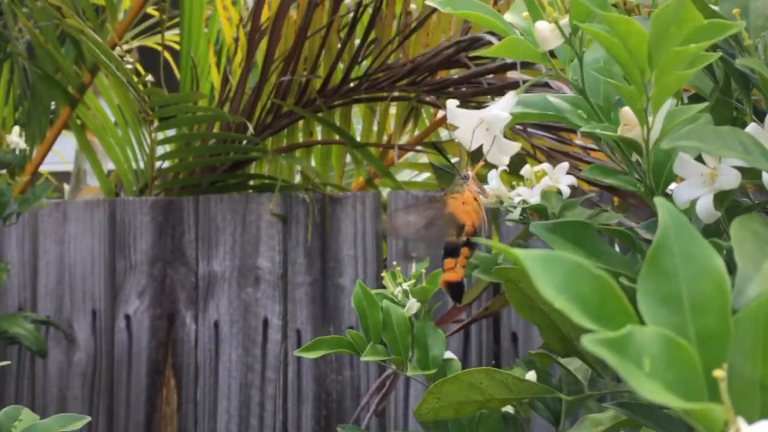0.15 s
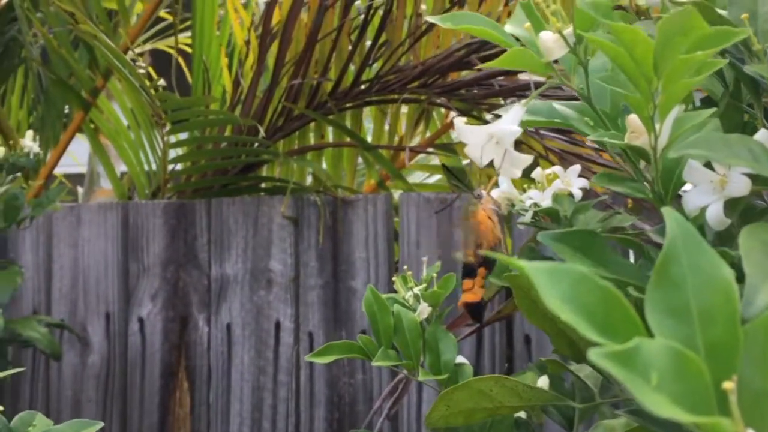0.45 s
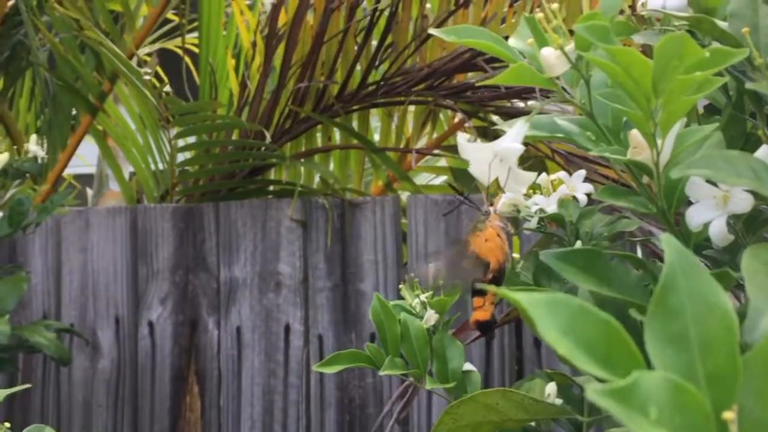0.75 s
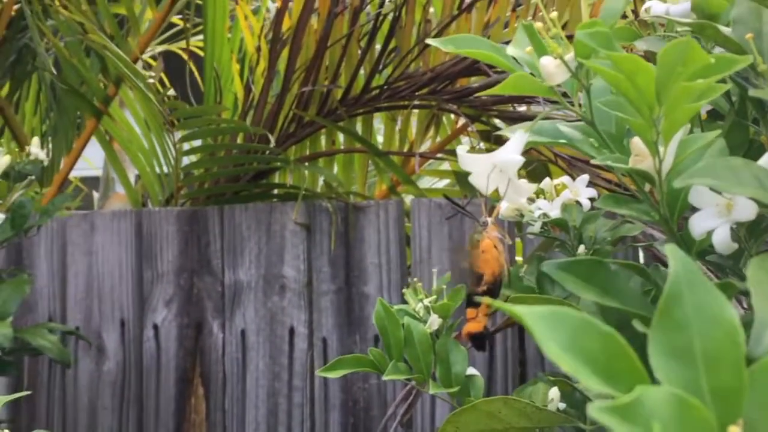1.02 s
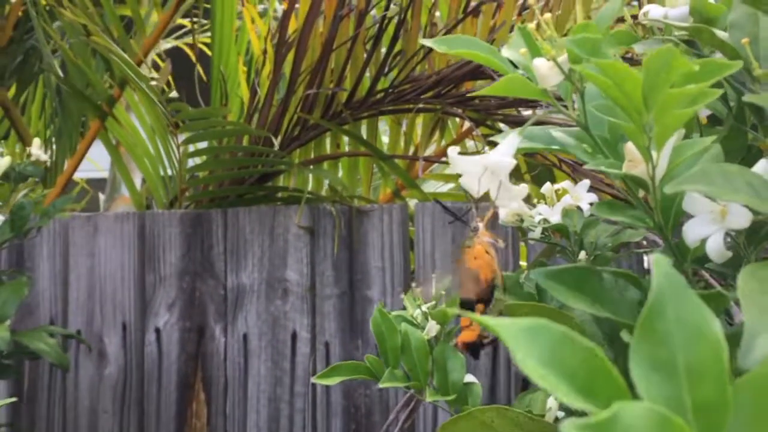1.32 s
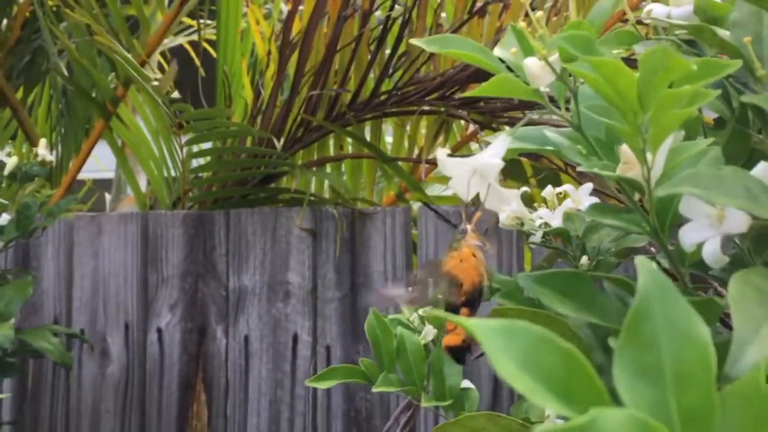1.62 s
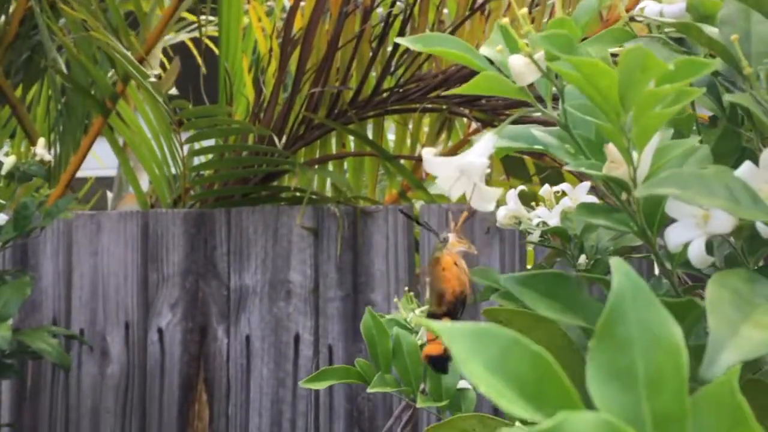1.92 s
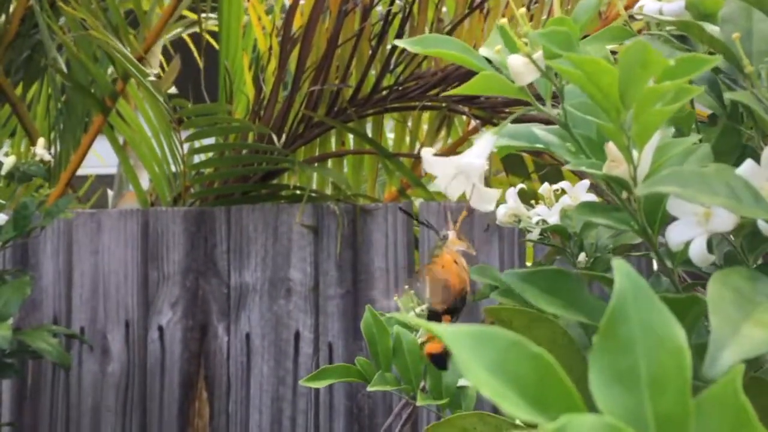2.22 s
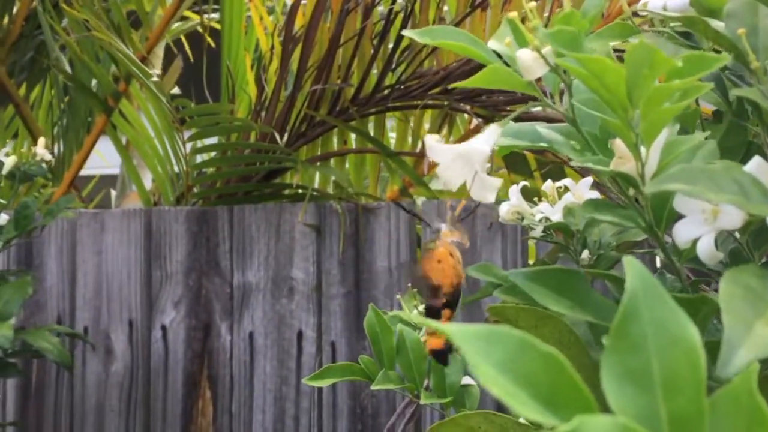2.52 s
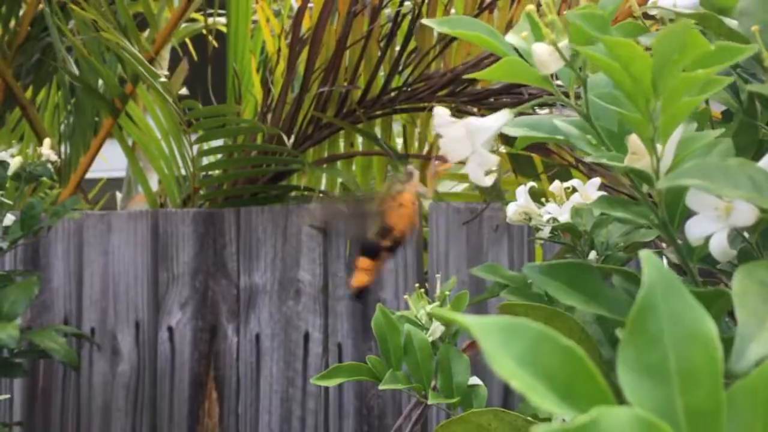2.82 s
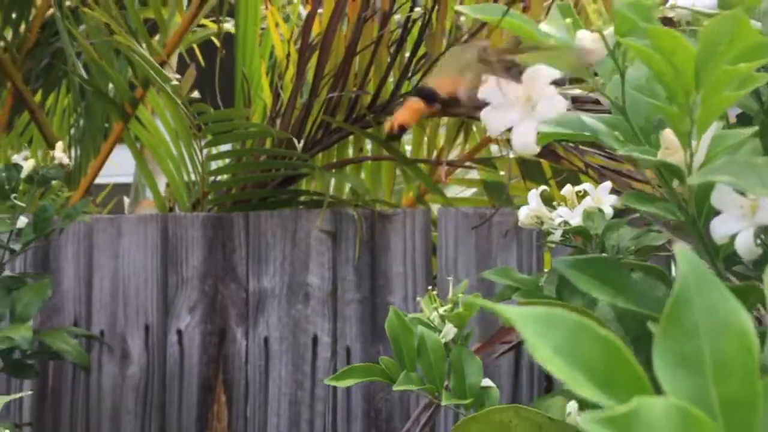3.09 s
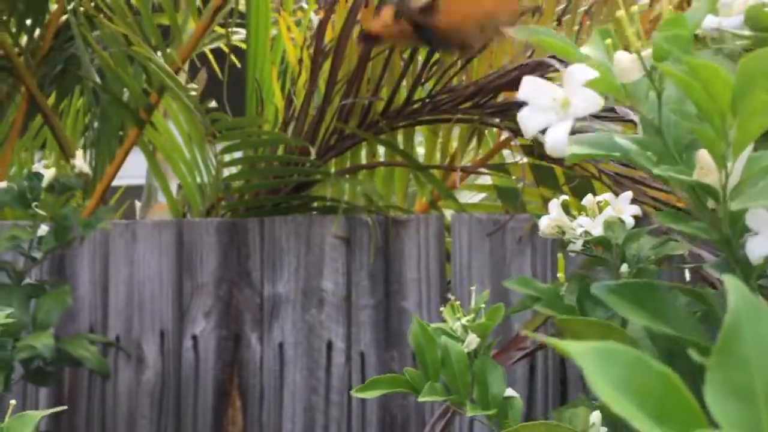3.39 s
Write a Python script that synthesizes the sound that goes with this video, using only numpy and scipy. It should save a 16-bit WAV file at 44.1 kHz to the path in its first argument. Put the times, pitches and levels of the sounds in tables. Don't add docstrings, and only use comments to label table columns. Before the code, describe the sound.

Fast pulsing moth wings emerge late from low engine rumble and distant traffic, with crisp leaf-brush snaps crowding together as the insect sweeps right by a phone outdoors; faint insect notes come early.

```python
import sys
import numpy as np
from scipy import signal
from scipy.fft import rfft, irfft
from scipy.io import wavfile

SR = 44100
rng = np.random.default_rng(int(sys.argv[2]) if len(sys.argv) > 2 else 0)


def file_out(sig):
    cols = np.atleast_2d(sig).T
    lim = np.clip(cols, -1, 1)
    pcm = np.round(lim * 32767).astype(np.int16)
    wavfile.write(sys.argv[1], SR, pcm)


def convert_level_to_amplitude(level_db):
    exponent = np.asarray(level_db, float) / 20
    return 10 ** exponent


N = 156555
TOP_HZ = 15740
SHAFT_HZ, MAINS_BUZZ_HZ = 51.105, 100.08


def in_time(rows):
    s, *columns = np.transpose(rows)
    return [np.interp(np.arange(N) / SR, s, column) for column in columns]


def rms_one(x):
    return x / np.sqrt(np.mean(x ** 2) + 1e-20)


def drift(rate):
    pole = np.exp(-80 * np.pi * rate / SR)
    noise = rng.standard_normal(N // 40 + 4002)
    slow = signal.lfilter([1], [1, -2 * pole, pole ** 2], noise)[4000:]
    return np.interp(np.arange(N) / 40, np.arange(len(slow)), rms_one(slow - slow.mean()))


def colour(x, spectrum):
    hz = np.fft.rfftfreq(N, 1 / SR) + 1
    at_hz, db = np.transpose(spectrum)
    gain = convert_level_to_amplitude(np.interp(np.log(hz), np.log(at_hz), db, left=-200))
    return irfft(rfft(x) * gain * (hz < TOP_HZ), N)


def patchy_noise(spectrum, patchy_db, rate):
    whole = rfft(colour(rng.standard_normal(N), spectrum))
    hz = np.fft.rfftfreq(N, 1 / SR)
    edges = np.geomspace(spectrum[0][0], spectrum[-1][0], 7)
    out = 0
    for low, high in zip(edges, edges[1:]):
        band = irfft(whole * ((hz >= low) & (hz < high)), N)
        out = out + convert_level_to_amplitude(patchy_db * drift(rate)) * band
    return rms_one(out)


def tone(hz, width_hz, wander_db):
    turns = np.cumsum(hz + width_hz * drift(2.93)) / SR + rng.random()
    return np.sqrt(2) * np.sin(2 * np.pi * turns) * convert_level_to_amplitude(wander_db * drift(2.8))


# time_s, beats
WING_BEATS = [(0, 0), (2.3955, 135), (2.677, 151), (2.9552, 167), (3.005, 170), (3.1024, 176), (3.204, 182),
              (3.269, 186), (3.3055, 188), (3.371, 192), (3.406, 194), (3.480, 198), (3.5588, 203)]
# time_s, rustle_db, throb_db
CLOSENESS = [(0, -98, -76), (1.6, -97, -76), (1.85, -88, -76), (2.2, -93, -76), (2.6, -83, -74),
             (2.75, -84, -72), (2.85, -81, -70), (2.95, -81, -66), (3.06, -74.5, -62), (3.15, -76.5, -61),
             (3.22, -75.5, -62), (3.3, -78, -58), (3.33, -77, -53), (3.365, -75.5, -50), (3.41, -77, -56),
             (3.465, -75.5, -60), (3.495, -72, -54), (3.52, -69, -50), (3.55, -65, -54)]
# frequency_hz, level_db per Hz
RUSTLE_COLOUR = [(2000, -3), (4000, 1.5), (4900, -4), (6200, 0), (7800, -2.5), (9400, -.5), (10400, -3),
                 (15700, 1)]
# multiple of the beat rate, level_db
THROB_HARMONICS = [(1, 0), (2, -2), (3, -9), (4, -14), (5, -16)]


def wings():
    tick_lead_beats, throb_lag_beats = .05, .16
    tick_s, tick_spread_db, upstroke_db = .0004, 2, -4
    second_wing_s, second_wing_db = .0028, -5
    swish_share = .33
    (beats,) = in_time(WING_BEATS)
    rustle_db, throb_db = in_time(CLOSENESS)

    half = np.floor(2 * (beats + tick_lead_beats)).astype(int)
    strokes = np.arange(half[-1] + 1)
    strength = convert_level_to_amplitude(tick_spread_db * rng.standard_normal(len(strokes)) + upstroke_db * (strokes % 2))
    reversals = np.diff(half, prepend=0) * strength[half]
    second_wing = np.roll(reversals, int(second_wing_s * SR))
    reversals = reversals + convert_level_to_amplitude(second_wing_db + 3 * drift(40)) * second_wing

    fade = np.exp(-1 / (tick_s * SR))
    ticks = rms_one(signal.lfilter([1], [1, -2 * fade, fade ** 2], reversals))
    swish = convert_level_to_amplitude(1.5 * drift(30))
    gate = np.sqrt((1 - swish_share) * ticks ** 2 + swish_share * swish ** 2)
    rustle = rms_one(colour(gate * rng.standard_normal(N), RUSTLE_COLOUR))

    stroke_phase = 2 * np.pi * (beats - throb_lag_beats)
    throb = sum(convert_level_to_amplitude(db) * np.cos(k * stroke_phase) for k, db in THROB_HARMONICS)
    return convert_level_to_amplitude(rustle_db) * rustle - convert_level_to_amplitude(throb_db) * np.sqrt(2) * throb


# middle_s, peak_db, lowest_hz, highest_hz
PETAL_BRUSHES = [(1.785, -63, 11000, 15500), (1.803, -65, 5000, 10000), (2.26, -64, 11000, 15500),
                 (2.3955, -58, 11500, 15500), (2.512, -61, 11000, 15500), (2.566, -60, 12000, 15500),
                 (2.585, -65, 11000, 15500), (2.617, -64, 6000, 15500), (2.663, -63, 13000, 15500),
                 (2.677, -56.5, 12000, 15500), (2.707, -64, 12500, 15500), (2.796, -65, 8500, 13000),
                 (2.813, -65, 9000, 14000), (2.881, -66, 9000, 15000), (2.898, -64, 7500, 11000),
                 (2.941, -63, 11000, 15500), (2.9552, -57, 10500, 15500), (2.998, -63, 3200, 4800),
                 (3.0215, -60, 11500, 15500), (3.047, -56, 3000, 6000), (3.063, -56, 3000, 7000),
                 (3.1024, -59, 9000, 15500), (3.138, -62, 8500, 13000), (3.172, -61, 9000, 15500),
                 (3.189, -59, 8000, 15500), (3.204, -50, 3800, 16200), (3.236, -62, 10000, 15500),
                 (3.262, -55, 3000, 5200), (3.339, -62, 7500, 14500), (3.371, -60, 6000, 15500),
                 (3.406, -61, 8500, 15500), (3.4245, -62, 8000, 15500), (3.443, -62, 5000, 14500),
                 (3.462, -62, 9000, 15500), (3.4805, -60, 7000, 15500), (3.4875, -59, 5000, 14000),
                 (3.4965, -55, 5500, 15500), (3.5055, -58, 2500, 15500), (3.5115, -58, 6000, 15500),
                 (3.5142, -58, 4000, 13500), (3.5175, -58, 3500, 7000), (3.5207, -56, 9000, 15500),
                 (3.5297, -56, 5500, 12500), (3.533, -59, 4000, 7000), (3.5425, -52, 8000, 15500),
                 (3.545, -52, 6000, 15500)]


def brushes():
    size, lead_s = 1024, .005
    out = np.zeros(N + 2000)
    hz = np.fft.rfftfreq(size, 1 / SR)
    after = np.maximum(np.arange(size) / SR - lead_s, 0)
    for s, db, low_hz, high_hz in PETAL_BRUSHES:
        length_s = .0008 * np.sqrt(8000 / low_hz)
        puff = rng.standard_normal(size) * after * np.exp(-2 * after / length_s)
        low_cut = 1 / (1 + (low_hz / (hz + 1)) ** 6)
        high_cut = (hz < max(TOP_HZ, high_hz)) / (1 + (hz / high_hz) ** 12)
        puff = irfft(rfft(puff) * low_cut * high_cut)
        i = int((s - length_s / 2 - lead_s) * SR)
        out[i:i + size] += convert_level_to_amplitude(db) * puff / np.abs(puff).max()
    return out[:N]


# time_s, deep_db, light_db, far_db
ENGINE_LOAD = [(0, 1, -5, -8), (.22, -3, -3, -2), (.5, 1, 2, 2), (.7, -7, -2, -2), (.95, -1, -2, 2),
               (1.2, -3, -2, 0), (1.42, -2, -2, 3), (1.62, 7, 0, -4), (1.85, -2, 4, -4), (2.05, 7, 3, 1),
               (2.35, 5, 1, -2), (2.6, -3, -1.5, -1), (2.85, -3, 0, 3), (3.1, -4, -4, 0),
               (3.22, -5, -4, -6), (3.4, -5, 0, -9), (3.55, -3, -2, -9)]
# pitch_hz, level_db rms
DEEP_ENGINE = [(48, -56), (291, -79)]
LIGHT_ENGINE = [(90.2, -57), (134.9, -65), (179.7, -76.5)]
# pitch_hz, level_db rms, width_hz
FAR_DRONES = [(59.2, -60, 2.5), (65, -61, 2.5), (73, -62, 2.5), (122, -63, 2.5)]


def engines():
    deep_db, light_db, far_db = in_time(ENGINE_LOAD)
    deep = sum(convert_level_to_amplitude(deep_db + db) * tone(hz, .6, 1.0) for hz, db in DEEP_ENGINE)
    light = sum(convert_level_to_amplitude(light_db + db) * tone(hz, .6, 1.0) for hz, db in LIGHT_ENGINE)
    far = sum(convert_level_to_amplitude(far_db + db) * tone(hz, width_hz, 1.5) for hz, db, width_hz in FAR_DRONES)
    return deep + light + far


# multiple of the shaft, level_db rms
SHAFT_ORDERS = [(3, -65.5), (5, -72), (6, -80), (8, -75), (9, -77), (10, -79), (12, -78), (16, -70.5),
                (69, -96), (74, -95), (75, -96), (76, -96), (82, -89)]
# frequency_hz, level_db rms
VALVE_RATTLE = [(1000, -88), (1700, -93), (2300, -94), (3100, -97), (3800, -97), (4400, -104), (5200, -102)]


def compressor():
    fourth_db, fan_db, together_s = -70.5, -68.5, .2
    rattle_spread_db = 2
    hum = sum(convert_level_to_amplitude(db) * tone(k * SHAFT_HZ, .3, 1.0) for k, db in SHAFT_ORDERS)

    turn = 2 * np.pi * (np.arange(N) / SR - together_s)
    fourth = convert_level_to_amplitude(fourth_db) * np.cos(4 * SHAFT_HZ * turn)
    fan = convert_level_to_amplitude(fan_db) * np.cos(2 * MAINS_BUZZ_HZ * turn)
    pair = np.sqrt(2) * (fourth + fan)

    shaft = turn * SHAFT_HZ + .05 * drift(1.5)
    rattle_hz, rattle_db = np.transpose(VALVE_RATTLE)
    rattle = 0
    for k in range(20, 103):
        db = np.interp(k * SHAFT_HZ, rattle_hz, rattle_db) + 1.0
        db = db + rattle_spread_db * rng.standard_normal()
        rattle = rattle + convert_level_to_amplitude(db) * np.sin(k * shaft + 2 * np.pi * rng.random())
    return hum + pair + rattle


# multiple of the mains buzz, level_db rms
MOTOR_WHINE = [(50, -101), (56, -103), (57, -91), (58, -95), (59, -99.5), (60, -101), (61, -103), (63, -99)]
# time_s, lower_db rms, upper_db rms
WHISTLE_LEVELS = [(0, -99, -100), (.35, -87, -96), (.85, -87, -91), (1.2, -88, -100), (1.45, -96, -90),
                  (2.5, -95, -90), (2.85, -90, -92), (3.2, -94, -89), (3.55, -96, -94)]
WHISTLE_PITCHES = (9786, 9990.5)


def motor():
    whine = sum(convert_level_to_amplitude(db) * tone(k * MAINS_BUZZ_HZ, 1.5, 1.5) for k, db in MOTOR_WHINE)
    levels = in_time(WHISTLE_LEVELS)
    whistles = sum(convert_level_to_amplitude(db) * tone(hz, 2.5, 2.0) for hz, db in zip(WHISTLE_PITCHES, levels))
    return whine + whistles


# start_s, length_s, level_db rms, pitch_hz
INSECT_NOTES = [(.03, .06, -90, 12205), (.135, .09, -81, 12013), (.312, .12, -80.5, 14444),
                (.35, .2, -90, 9159), (.415, .05, -89, 13600), (.6, .1, -84, 12210), (.615, .09, -81, 6520),
                (.695, .07, -84, 12100), (.69, .08, -91, 9159), (1.77, .05, -88, 12950),
                (2.06, .13, -86, 7510)]


def insects():
    attack_s, fade_db, width_hz = .012, -14, 31
    t, out = np.arange(N) / SR, 0
    for s, length_s, db, hz in INSECT_NOTES:
        attack = np.clip((t - s) / attack_s, 0, 1)
        fade = fade_db * np.maximum((t - s) / length_s, 0) ** 1.5
        out = out + convert_level_to_amplitude(db + fade) * attack * tone(hz, width_hz, 1.0)
    return out


# middle_s, length_s, level_db rms, centre_hz
PASSING_CARS = [
    (1.29, .3, -66, 1240),
    (1.77, 0.55, -67.5, 1000),
    (0.8, 0.24, -69.5, 1130),
    (2.5, 0.3, -85, 770),
]


def cars():
    half_width_oct = 0.27
    t, out = np.arange(N) / SR, 0
    for s, length_s, db, hz in PASSING_CARS:
        edges_hz = hz * 2 ** (half_width_oct * np.array([-1, 1]))
        band = signal.butter(2, edges_hz, "band", fs=SR, output="sos")
        tyres = rms_one(signal.sosfilt(band, rng.standard_normal(N)))
        out = out + convert_level_to_amplitude(db) * np.exp(-(2 * (t - s) / length_s) ** 2) * tyres
    return out


# time_s, level_db
TRAFFIC_SWELL = [(0.0, -64), (0.03, -62.5), (1.27, -62), (1.86, -62), (1.89, -61), (1.97, -61.5),
                 (2.3, -63), (3.39, -61), (3.4, -62.5)]
# frequency_hz, level_db per Hz
ROAR_COLOUR = [(300, -16.5), (420, -6.5), (800, -2.5), (1150, -5), (1750, -10.5), (2150, -15.5),
               (3200, -19.5), (4300, -24), (4800, -28.5)]
RUMBLE_COLOUR = [(30, -17), (38, 2), (84, -3.5), (150, -8), (225, -15), (300, -20.5), (360, -21.5),
                 (450, -30.5)]


def traffic():
    (roar_db,) = in_time(TRAFFIC_SWELL)
    roar = convert_level_to_amplitude(roar_db) * patchy_noise(ROAR_COLOUR, patchy_db=1.13, rate=4.3)
    rumble = convert_level_to_amplitude(-54) * patchy_noise(RUMBLE_COLOUR, patchy_db=1.0, rate=4.5)
    return roar + rumble


# frequency_hz, level_db per Hz
HISS_COLOUR = [(4300, -29), (4800, -1.5), (5920, 1.5), (7840, -4), (9440, -1.5), (10300, -6), (11500, -2.5),
               (15740, -1.5)]


def hiss():
    return convert_level_to_amplitude(-77) * patchy_noise(HISS_COLOUR, patchy_db=1.07, rate=13.0)


def scene():
    moth = wings() + brushes()
    machines = engines() + compressor() + motor()
    background = insects() + cars() + traffic() + hiss()
    return (moth + machines + background)[None]


def band_limit(x):
    return signal.sosfilt(signal.butter(12, 16350, fs=SR, output="sos"), x)


def record(dry):
    bass_cut = signal.butter(3, 37.1, "high", fs=SR, output="sos")
    mix = signal.sosfiltfilt(bass_cut, dry)
    return band_limit(mix)


dry = scene()
out = record(dry)
file_out(out)
```